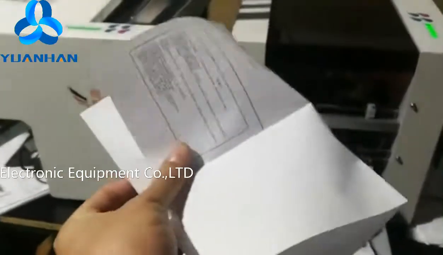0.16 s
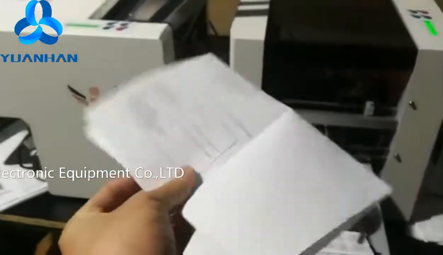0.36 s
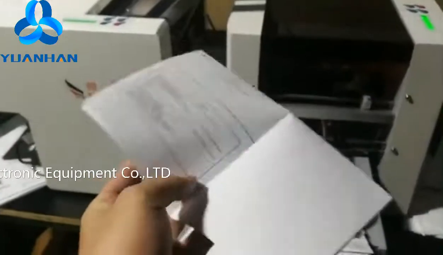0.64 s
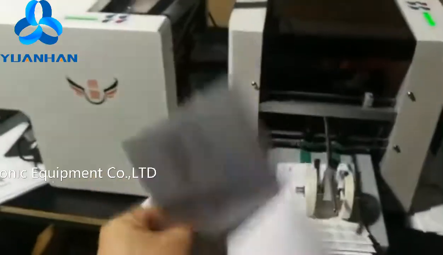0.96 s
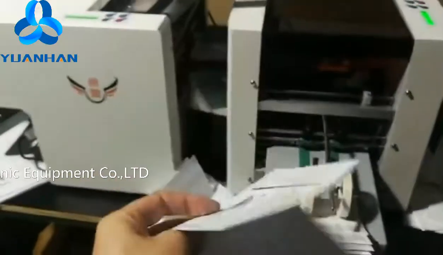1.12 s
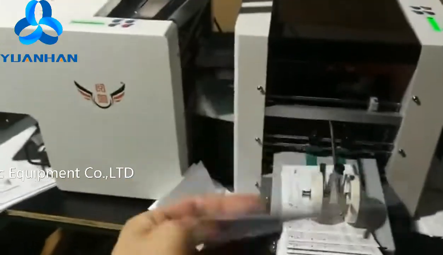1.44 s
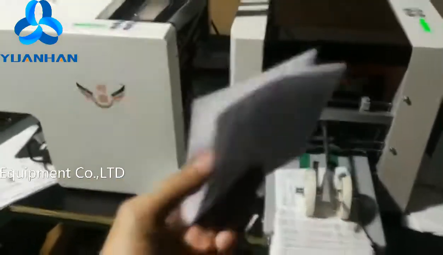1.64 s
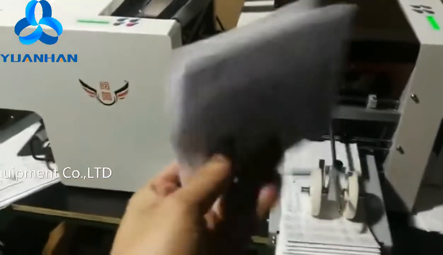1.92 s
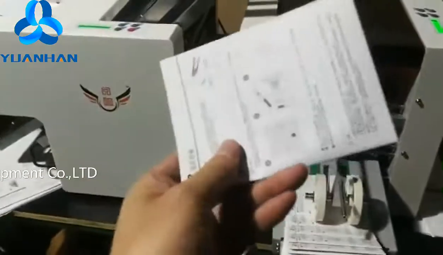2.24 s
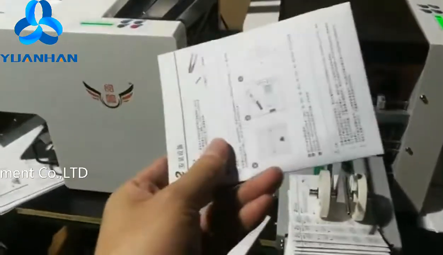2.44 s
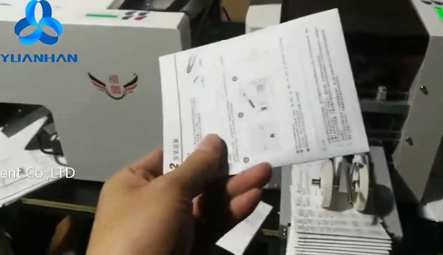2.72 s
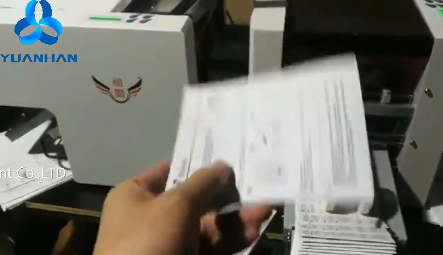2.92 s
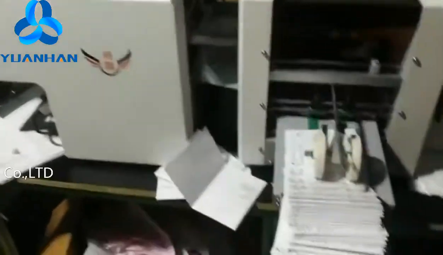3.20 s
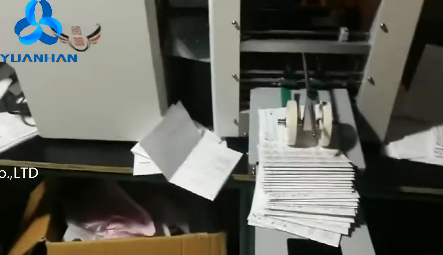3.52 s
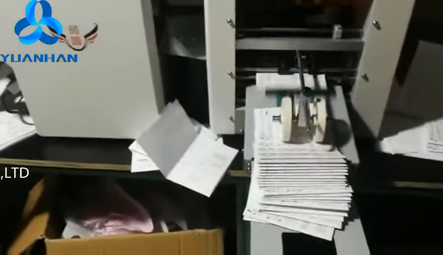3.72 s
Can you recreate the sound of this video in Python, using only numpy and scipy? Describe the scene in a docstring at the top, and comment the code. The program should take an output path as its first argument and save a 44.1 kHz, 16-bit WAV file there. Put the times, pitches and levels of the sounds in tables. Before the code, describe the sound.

Paper folding machine, slightly right of a nearby handheld stereo microphone, repeats clacks, crisp paper ticks and slaps over belt hiss and pulsing suction air, with short workshop echoes and little deep bass.

```python
"""Paper folding machine in a workshop

A hand-held stereo microphone has the machine a little to its right, its direct sound above the room echo.
Each 0.59 s cycle: a metal clack with a rebound, the sheet is fed, ticks and snaps through the fold plates,
slaps through the rollers and drops out, all as shaped noise grains; metal stop and frame ring as modes.
Under it motor, belts, frame and suction drone and hiss: filtered noise that rises and falls with the cycle.
"""
import sys
import numpy as np
from scipy import signal
from scipy.io import wavfile

SR = 44100
rng = np.random.default_rng(int(sys.argv[2]) if len(sys.argv) > 2 else 0)


def store_pcm(level_fs):
    """Save levels as 16-bit WAV."""
    pcm = np.round(np.clip(level_fs, -1, 1) * 32767).astype(np.int16)
    wavfile.write(sys.argv[1], SR, np.atleast_2d(pcm).T)


N = 170226  # samples
CYCLE_S, FIRST_CLACK_S = .5922, -.0335


def amp(db):
    """dB to gain."""
    return 10 ** (np.asarray(db) / 20)


def rms_one(x):
    """Scale to rms 1."""
    return x / np.sqrt(np.mean(x ** 2) + 1e-20)


def at_hz(points, hz):
    """Read a table on a log-frequency axis."""
    table_hz, values = np.transpose(points)
    return np.interp(np.log(hz), np.log(table_hz), values)


def in_cycle(points):
    """A curve repeated every machine cycle."""
    return np.interp((np.arange(N) / SR - FIRST_CLACK_S) % CYCLE_S, *np.transpose(points))


def drift(rate):
    """Slow random curve of rms 1: noise through two equal poles at rate Hz."""
    step = 40  # samples between the computed points
    r = np.exp(-2 * np.pi * rate * step / SR)
    noise = rng.standard_normal(N // step + 2002)
    slow = signal.lfilter([1], [1, -2 * r, r * r], noise)[2000:]
    return np.interp(np.arange(N) / step, np.arange(len(slow)), rms_one(slow))


def ring(clicks, hz, t60):
    """Two-pole resonance: a unit click sets a decaying sine of height 1 ringing."""
    r, w = amp(-60 / (t60 * SR)), 2 * np.pi * hz / SR
    return signal.lfilter([0, np.sin(w)], [1, -2 * r * np.cos(w), r * r], clicks + 1e-18)


# How alike the two sides of the microphone hear each pitch. Each row: frequency in Hz, likeness from 0 to 1.
LIKENESS_BY_PITCH = [(40, .75), (100, .95), (200, .96), (310, .88), (450, .2), (1000, .5), (2200, .2),
                     (3000, .25), (5000, .0)]
# How far each pitch leans to one side. Each row: frequency in Hz, left against right in dB.
LEAN_BY_PITCH = [(100, 0.0), (180, -0.5), (310, -0.5), (530, 1.0), (920, 1.0), (1600, 0.0), (2760, -3.5),
                 (4770, -8.0), (8240, -7.5)]


def placed(mid, side, hz):
    """Middle and side signals become a stereo pair with the likeness and lean of that pitch."""
    alike = np.clip(at_hz(LIKENESS_BY_PITCH, hz), 0, 1)
    lean = amp(at_hz(LEAN_BY_PITCH, hz) * np.array([[.5], [-.5]]))
    return lean * (np.sqrt(1 + alike) * mid + np.sqrt(1 - alike) * side * [[1], [-1]])


def bank(source, low_hz):
    """Third-octave stereo bands of two middle-side pairs taken in turn, and the band centres in Hz."""
    edges = low_hz * 2 ** np.arange(0, np.log2(8500 / low_hz), 1 / 3)
    hz = np.sqrt(edges[1:] * edges[:-1])
    bands = []
    for k, centre in enumerate(hz):
        sos = signal.butter(2, edges[k:k + 2], "band", fs=SR, output="sos")
        mid, side = signal.sosfilt(sos, source[k % 2])
        bands.append(placed(mid, side, centre))
    return hz, np.array(bands)


# Spectrum of belts and rollers. Each row: frequency in Hz, relative level in dB per Hz.
DRONE_SPECTRUM = [(30, -8), (62, -29), (110, -23), (160, -17), (250, -9), (395, -12), (480, -20),
                  (620, -13.5), (960, -7.5), (1600, -9), (2500, -12), (3800, -9.5), (6600, -13),
                  (7600, -13)]
# Treble level of the belt hiss over a cycle. Each row: time into the cycle in seconds, level in dB.
TRAVEL_CURVE = [(0, -3), (.04, 1), (.11, -1), (.2, 1.5), (.27, 2.5), (.33, 0), (.45, 1), (.54, -4),
                (.5922, -3)]
DRONE_DB, DRONE_PATCHY_DB, FLUTTER_DB = -32.0, 3.2, 1.0


def drone():
    """Belts and rollers: broad fluttering noise that breathes with the travel of the sheet, most in the treble."""
    hz, bands = bank(rng.standard_normal((2, 2, N)), 42)
    travel_db = in_cycle(TRAVEL_CURVE) + FLUTTER_DB * drift(40)
    travel_share = np.clip(np.log2(hz / 500) / 3.0, 0, 1.5)
    out = 0
    for centre, share, band in zip(hz, travel_share, bands):
        level_db = at_hz(DRONE_SPECTRUM, centre) + DRONE_PATCHY_DB * drift(12) + travel_db * share
        out = out + amp(level_db) * band
    return amp(DRONE_DB) * rms_one(out)


def resonant_noise(table, waver_db, wander):
    """Noise twice through narrow resonances that waver in level and wander in pitch."""
    out = 0
    for hz, width, db in table:
        read = np.cumsum(1 + wander * drift(3)) % (N - 1)  # uneven reading speed bends the pitch
        pair = []
        for noise in rng.standard_normal((2, N)):
            tone = ring(ring(noise, hz, 2.2 / width), hz, 2.2 / width)
            pair.append(rms_one(np.interp(read, np.arange(N), tone)))
        out = out + amp(db + waver_db * drift(5)) * placed(*pair, hz)
    return out


# Housing resonances the motor keeps ringing. Each row: frequency in Hz, width in Hz, level in dB.
HOUSING_HUMS = [(192, 40, -44), (210, 35, -46), (308, 60, -49), (382, 40, -51), (1215, 60, -53),
                (2226, 50, -53), (3090, 80, -51)]


def motor_hums():
    """The motor as noise through housing resonances."""
    return resonant_noise(HOUSING_HUMS, waver_db=2.5, wander=.015)  # wander: share of pitch


# Whistling air of the suction feed. Each row: frequency in Hz, width in Hz, level in dB before the pull.
SUCTION_WHISTLES = [(981, 25, -44), (3650, 90, -47), (4000, 100, -49), (5500, 250, -44), (6650, 700, -44)]
# Pull of the suction over a cycle. Each row: time into the cycle in seconds, level in dB.
PULL_CURVE = [(0, -12), (.07, -6), (.14, -1), (.21, 0), (.27, -3), (.36, -12), (.5922, -12)]


def suction():
    """Whistling air: resonant noise that swells at the same point of every cycle."""
    return amp(in_cycle(PULL_CURVE)) * resonant_noise(SUCTION_WHISTLES, waver_db=3.0, wander=.015)


def struck(blows, modes):
    """Each blow (s, dB) rings every mode, its strength drawn apart for middle and side."""
    s, db = np.transpose(blows)
    out = 0
    for hz, level_db, t60 in modes:
        clicks = np.zeros((2, N))
        clicks[:, (s * SR).astype(int)] = amp(db + level_db + rng.normal(0, 1.5, (2, len(s))))
        mid, side = ring(clicks, hz, t60)
        quarter_period = int(SR / hz / 4)
        out = out + placed(mid, np.roll(side, quarter_period), hz)
    return out


def blows_of(rows, offset_db):
    """Times and levels of a table of events, as blows for struck."""
    return [(row[0], row[1] + offset_db) for row in rows]


# Modes of the frame. Each row: frequency in Hz, level in dB, 60 dB decay in seconds.
FRAME_MODES = [(97, -6, .25), (122, -7, .18), (185, -8, .2), (212, -6, .2), (255, -8, .12), (310, -7, .14),
               (385, -9, .12)]


def thumps():
    """The frame answers the heavier blows with a soft low knock."""
    blows = (blows_of(CLACK_EVENTS, -13) + blows_of(REBOUND_AND_RATTLE_EVENTS, -14) + blows_of(SLAP_EVENTS, -21)
             + blows_of(SNAP_EVENTS, -21) + blows_of(DROP_EVENTS, -16))
    soft = signal.butter(2, [80, 300], "band", fs=SR)
    return signal.lfilter(*soft, struck(blows, FRAME_MODES))


# Modes of the struck stop. Each row: frequency in Hz, level in dB, 60 dB decay in seconds.
STOP_MODES = [(1100, -13, .15), (2000, -10, .03), (2222, 0, .085), (2530, -11, .1), (3070, -8, .05),
              (6600, -13, .07), (7200, -10, .05)]
SECOND_TOUCH_S, SECOND_TOUCH_DB = .0054, -3


def metal_stop():
    """Clacks, rebounds and small rattles ring the modes of the metal stop, touched twice in each blow."""
    blows = blows_of(CLACK_EVENTS, -11.5) + blows_of(REBOUND_AND_RATTLE_EVENTS, -17)
    second = [(s + SECOND_TOUCH_S, db + SECOND_TOUCH_DB) for s, db in blows]
    return struck(blows + second, STOP_MODES)


GRAIN_DB, GRAINS_PER_S = 2.8, 6000
CLUMP_DB, CLUMPS_PER_S = 1.8, 120  # the crackle comes in uneven clumps


def grain_bands():
    """Dense random clicks of uneven strength, split into bands of equal level per Hz."""
    strength = amp(GRAIN_DB * np.minimum(rng.exponential(1, (2, 2, N)), 4))
    grains = strength * (rng.random((2, 2, N)) < GRAINS_PER_S / SR)
    clumps = np.array([drift(CLUMPS_PER_S), drift(CLUMPS_PER_S)])
    grains *= amp(CLUMP_DB * clumps)[:, None]
    hz, bands = bank(grains * rng.choice([-1, 1], (2, 2, N)) + 1e-18, 480)
    power = np.mean(bands.mean(axis=1) ** 2, axis=1)
    widths = np.diff(hz, prepend=hz[0] * 2 ** (-1 / 3))
    return hz, bands / np.sqrt(power / widths)[:, None, None]


SLOW_BELOW_HZ, SLOW_POWER, SLOW_LOSS_DB = 2000, .9, 5  # lower bands rise slower, last longer, lose dB per octave


def burst_shape(shape, hz, t):
    """A rise, then a quick fall and a slower workshop tail, for every band."""
    lead, rise, t60, _, tail_db, tail_t60, _ = shape
    pace = np.minimum(hz / SLOW_BELOW_HZ, 1)[:, None, None] ** SLOW_POWER
    after = np.maximum(pace * t - rise - lead, 0)
    onset = np.minimum(pace * t / (rise + lead + 1e-4), 1) ** 2
    return onset * (amp(-60 * after / t60) + amp(tail_db - 60 * after / tail_t60))


COLOUR_SPREAD_DB, TREBLE_LOSS_DB = 2.0, 3
STRONGEST_DB, STRONGEST_OCTAVES = 5, .25  # lift around the strongest pitch of a sheet sound, and its width


def burst_colour(colour, hz, treble_change_db, pitch):
    """Band gains of one burst, with chance and pitch lift, set to unit power between 1.5 and 4.5 kHz."""
    gain_db = at_hz(colour, hz) + SLOW_LOSS_DB * np.log2(np.minimum(hz / SLOW_BELOW_HZ, 1))
    gain_db += COLOUR_SPREAD_DB * rng.standard_normal(len(hz))
    gain_db += (treble_change_db - TREBLE_LOSS_DB) * (hz > 4500)
    for strongest in pitch:
        gain_db += STRONGEST_DB * np.exp(-(np.log2(hz / strongest) / STRONGEST_OCTAVES) ** 2)
    gain = amp(gain_db)
    middle = (hz > 1500) & (hz < 4500)
    return gain / np.sqrt(np.sum(gain[middle] ** 2 * hz[middle] * .23))  # .23: band width as a share of pitch


# Metal clacks. Each row: start in seconds, level in dB, treble against middle in dB, left against right in dB.
CLACK_EVENTS = [(0.5581, -14, -7, -3.0), (1.1503, -12, -10, -1.0), (1.7419, -13, -8, -1.0),
                (2.3356, -14, -11, -0.5), (2.9163, -13, -12, -4.0), (3.5194, -13, -13, -0.5)]
# Rebounds of the metal and small rattles. Each row: the same four columns and units as the clacks.
REBOUND_AND_RATTLE_EVENTS = [(0.0313, -21, -13, -3.0), (0.5921, -16, -13, -1.5), (1.1874, -14, -8, -4.0),
                             (1.2426, -14, -16, -3.5), (1.7794, -20, -10, -1.0), (1.8382, -21, -10, -2.0),
                             (2.3694, -18, -14, -2.0), (2.9512, -17, -9, -2.5), (2.9684, -20, -6, -3.5),
                             (3.5554, -19, -7, -2.5)]
# The sheet is fed. Each row: the four columns of the clacks, then strongest pitch in Hz.
FEED_EVENTS = [(0.2294, -11, -11, -7.0, 4550), (0.817, -14, -13, -5.5, 3750), (1.4177, -10, -9, -7.0, 5070),
               (1.9944, -12, -9, -4.0, 3200), (2.598, -15, -9, -5.5, 4700), (3.2565, -14, -11, -5.0, 3610)]
# The sheet ticks in the fold plates. Each row: the five columns of the feeds.
TICK_EVENTS = [(0.2887, -13, -10, -7.0, 3980), (0.8779, -8, -10, -7.5, 3680), (1.476, -7, -19, -8.0, 3790),
               (2.0517, -12, -7, -9.0, 3900), (2.6579, -15, -8, -9.0, 3980), (3.3154, -14, -4, -3.5, 3930)]
# The fold snaps. Each row: the five columns of the feeds.
SNAP_EVENTS = [(0.3272, -12, -10, -4.0, 3610), (0.9148, -10, -4, -6.0, 3380),
               (1.5135, -13, -12, -6.0, 3100), (2.0887, -4, -12, -9.0, 3300),
               (2.6928, -11, -11, -6.5, 4900)]
# The sheet slaps through the rollers. Each row: the four columns of the clacks.
SLAP_EVENTS = [(0.381, -7, -14, -3.5), (0.9727, -9, -14, -3.0), (1.5643, -8, -12, -3.0),
               (2.1585, -6.5, -14, -4.5), (2.7377, -8, -14, -3.0), (3.3403, -6.5, -10, -3.0)]
# The sheet drops out. Each row: the four columns of the clacks.
DROP_EVENTS = [(0.4644, -22, -12, -2.0), (1.0544, -18, -13, -3.5), (1.6494, -20, -11, -3.5),
               (2.2444, -17, -15, -4.5), (2.8294, -20, -17, -3.5), (3.4294, -19, -16, -4.0)]
# Colours of metal, sheet, tick, crease and slap. Each row: frequency in Hz, relative level in dB per Hz.
METAL_COLOUR = [(500, -20), (1030, -7), (1740, -9), (2190, -2), (2480, -6), (5990, -11), (6790, -6),
                (7700, -11)]
SHEET_COLOUR = [(600, -24), (971, -8), (2290, -10), (2600, -9), (3260, -4), (5460, -7), (7700, -20)]
TICK_COLOUR = [(1500, -30), (2500, -12), (3700, 0), (4600, -5), (6000, -20)]
CREASE_COLOUR = [(600, -26), (1250, -29), (2020, -11), (3260, -2), (3880, -5), (5160, -4), (7700, -27)]
SLAP_COLOUR = [(500, -17), (1080, -10), (1530, -10), (2260, -2.5), (3620, -2), (5920, -10), (6490, -4),
               (7700, -14)]
# Shape of each kind of burst, one row: lead-in in seconds, rise in seconds, 60 dB decay in seconds,
# level in dB, tail in dB, 60 dB decay of the tail in seconds, crack in dB.
CLACK_ENVELOPE = (.0, .0015, .04, -12, -5, .35, -8)
REBOUND_ENVELOPE = (.004, .004, .08, -13, -6, .3, -10)
FEED_ENVELOPE = (.004, .002, .1, -12, -6, .3, -4)
TICK_ENVELOPE = (.004, .0015, .02, -10, -13, .3, -1.5)
SNAP_ENVELOPE = (.002, .001, .035, -12.5, -4, .3, -2)
SLAP_ENVELOPE = (.016, .004, .08, -11, -5, .4, -5)
DROP_ENVELOPE = (.014, .012, .12, -11, -14, .2, -20)
EVENT_LEAN_DB = -3.5  # left-right value at which a burst keeps the lean of its pitches
BODY_FOLLOWS = .5  # share of a peak's excess that the grains follow; the crack follows all of it


def bursts():
    """Paper and contact noise: a crack, then dense grains under a rise, a quick fall and a slower tail."""
    hz, bands = grain_bands()
    out, t = np.zeros((2, N)), np.arange(SR // 4) / SR
    impulse = np.zeros((2, 2, len(t))) + (t == 0) * [[1], [.5]]  # middle 1, side .5
    _, click = bank(impulse, 480)
    kinds = ((CLACK_EVENTS, METAL_COLOUR, CLACK_ENVELOPE), (REBOUND_AND_RATTLE_EVENTS, SLAP_COLOUR, REBOUND_ENVELOPE),
             (FEED_EVENTS, SHEET_COLOUR, FEED_ENVELOPE), (TICK_EVENTS, TICK_COLOUR, TICK_ENVELOPE),
             (SNAP_EVENTS, CREASE_COLOUR, SNAP_ENVELOPE), (SLAP_EVENTS, SLAP_COLOUR, SLAP_ENVELOPE),
             (DROP_EVENTS, SHEET_COLOUR, DROP_ENVELOPE))
    for rows, colour, envelope in kinds:
        lead, db, crack_db = envelope[0], envelope[3], envelope[6]
        shape = burst_shape(envelope, hz, t)
        usual_db, usual_treble_db = np.mean([row[1:3] for row in rows], axis=0)
        for s, peak_db, treble_db, pan_db, *pitch in rows:
            gain = burst_colour(colour, hz, treble_db - usual_treble_db, pitch)
            i = max(int((s - lead) * SR), 0)
            part = bands[:, :, i:i + len(t)]
            length = part.shape[2]
            body = np.tensordot(gain, part * shape[:, :, :length], 1)
            body *= amp((BODY_FOLLOWS - 1) * (peak_db - usual_db))
            crack = np.roll(np.tensordot(gain, click, 1), int(lead * SR), axis=1)[:, :length]
            crack = amp(crack_db - db) * crack / np.abs(crack.mean(axis=0)).max()
            lean = amp((pan_db - EVENT_LEAN_DB) * np.array([[.5], [-.5]]))
            out[:, i:i + length] += amp(peak_db + db) * lean * (body + crack)
    return out


SHOP_T60_S, SHOP_DB, SHOP_LOW_HZ = .25, -9, 500


def workshop(x):
    """Dense echoes off walls and cabinets: decaying noise, different in each channel, without its bass."""
    t = np.arange(SR // 3) / SR
    echo = rng.standard_normal((2, len(t))) * amp(-60 * t / SHOP_T60_S) * (t > .003)
    echo /= np.sqrt(np.sum(echo ** 2, axis=1))[:, None]
    echo = signal.lfilter(*signal.butter(2, SHOP_LOW_HZ, "high", fs=SR), echo)
    return x + amp(SHOP_DB) * signal.fftconvolve(x, echo, axes=1)[:, :N]


def scene():
    """The machine, all parts, in its room."""
    background = drone() + motor_hums() + suction()
    return workshop(background + thumps() + metal_stop() + bursts())


MIC_LOW_HZ, CUTOFF_HZ = 80, 7600


def record(dry):
    """The microphone drops the deep bass, peaks are rounded, the top is cut."""
    thin = signal.sosfilt(signal.butter(3, MIC_LOW_HZ, "high", fs=SR, output="sos"), dry)
    rounded = 1.1 * np.tanh(thin / 1.1)
    return signal.sosfilt(signal.ellip(10, .5, 60, CUTOFF_HZ, fs=SR, output="sos"), rounded)


dry = scene()
out = record(dry)
store_pcm(out)
```